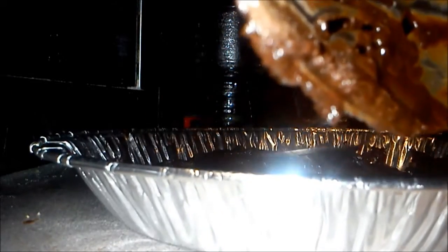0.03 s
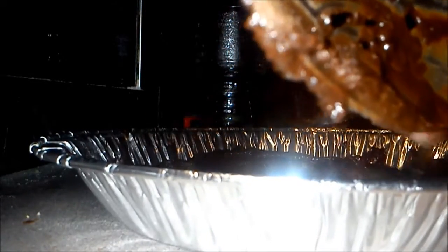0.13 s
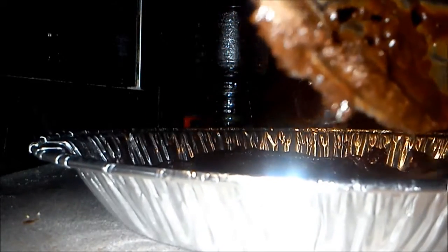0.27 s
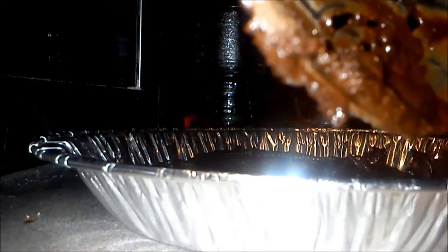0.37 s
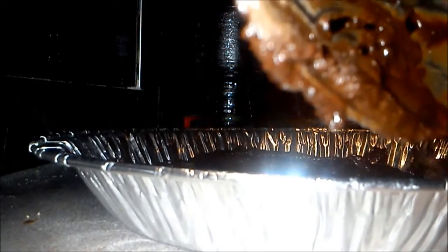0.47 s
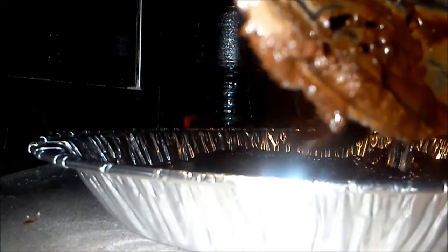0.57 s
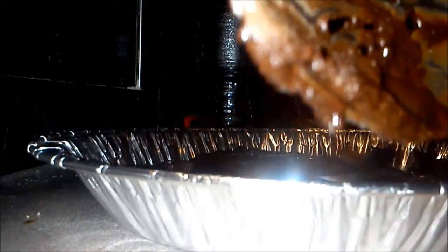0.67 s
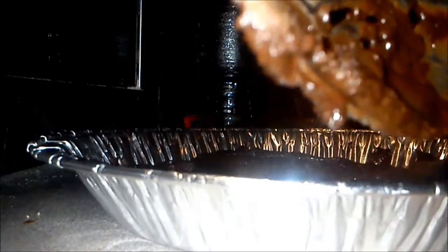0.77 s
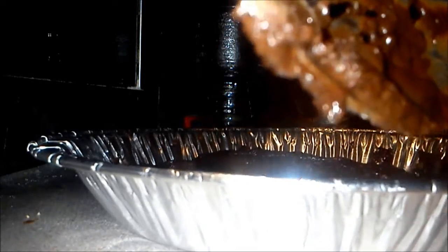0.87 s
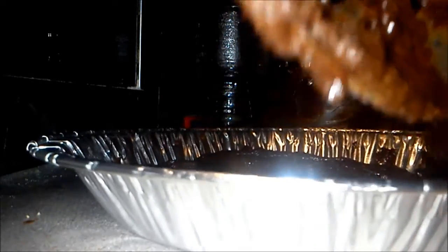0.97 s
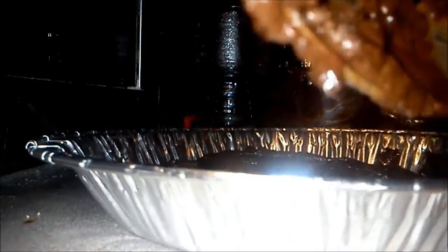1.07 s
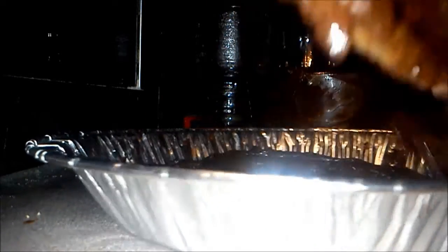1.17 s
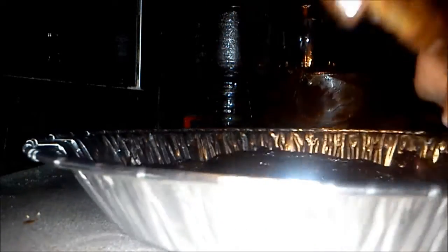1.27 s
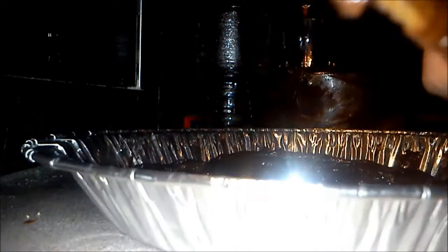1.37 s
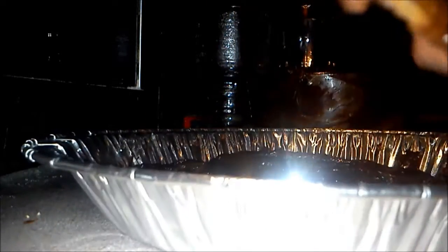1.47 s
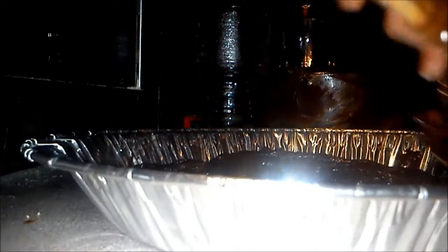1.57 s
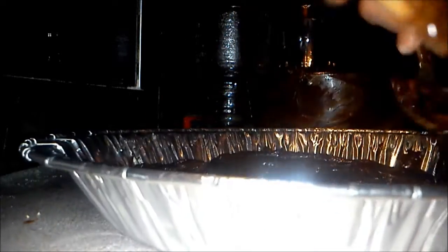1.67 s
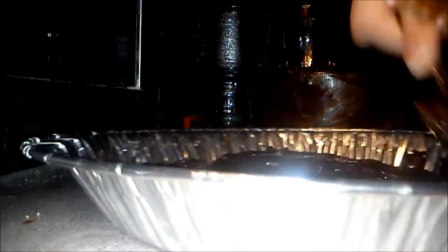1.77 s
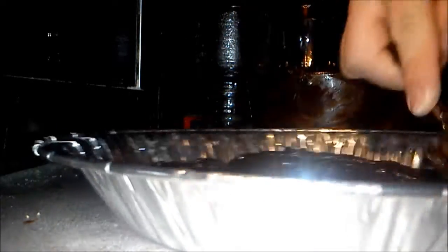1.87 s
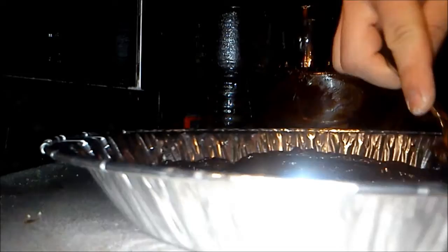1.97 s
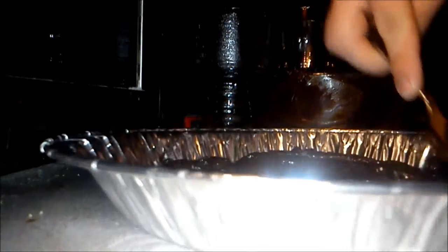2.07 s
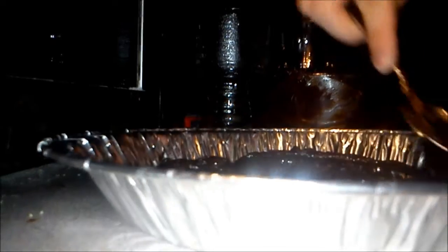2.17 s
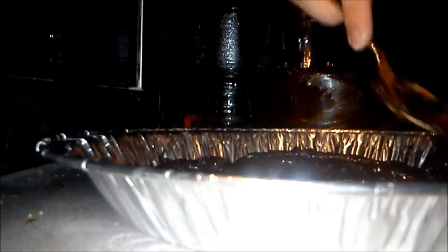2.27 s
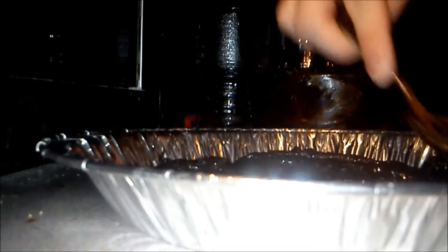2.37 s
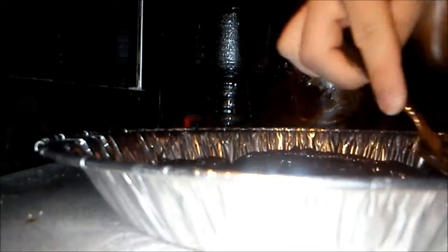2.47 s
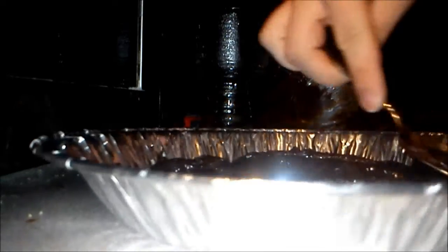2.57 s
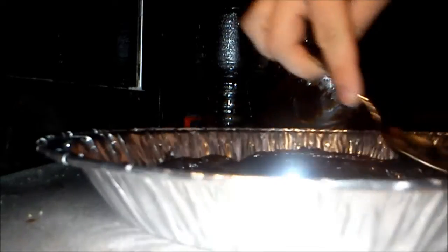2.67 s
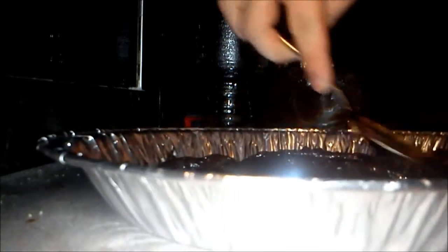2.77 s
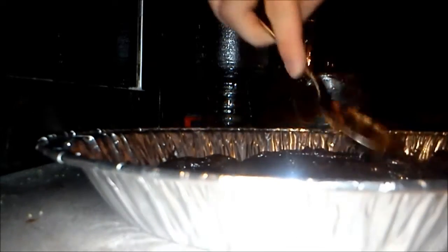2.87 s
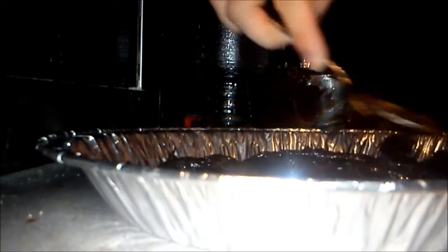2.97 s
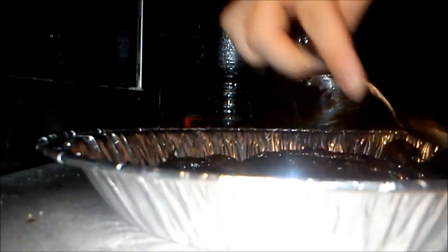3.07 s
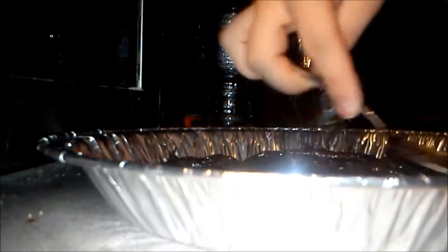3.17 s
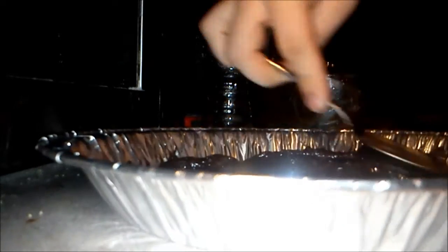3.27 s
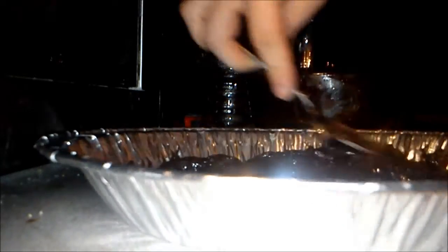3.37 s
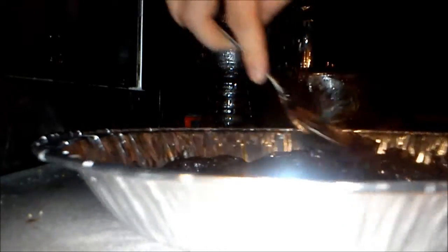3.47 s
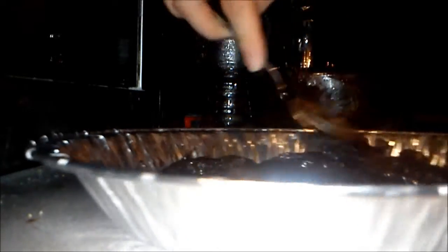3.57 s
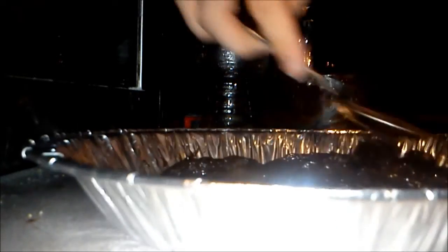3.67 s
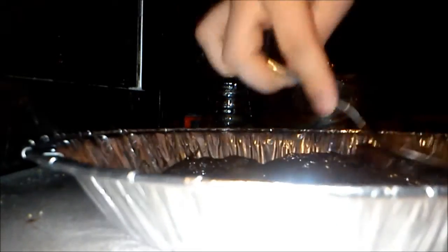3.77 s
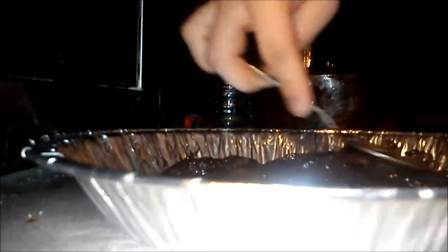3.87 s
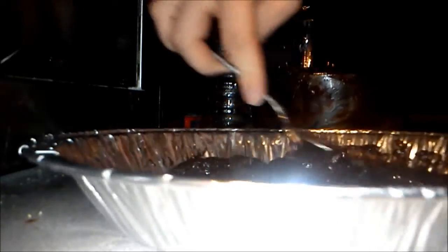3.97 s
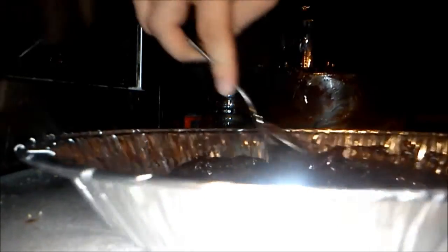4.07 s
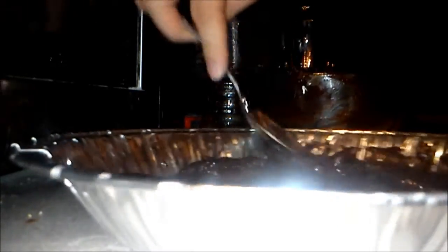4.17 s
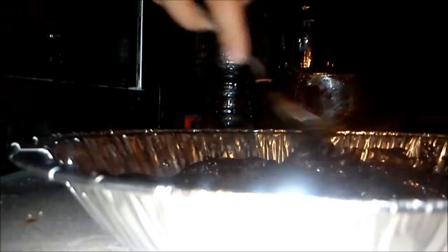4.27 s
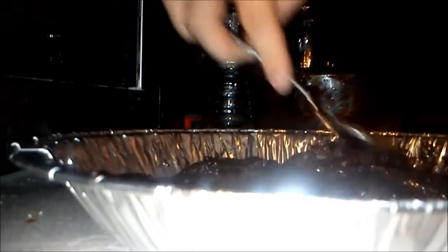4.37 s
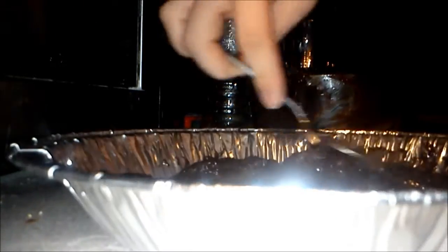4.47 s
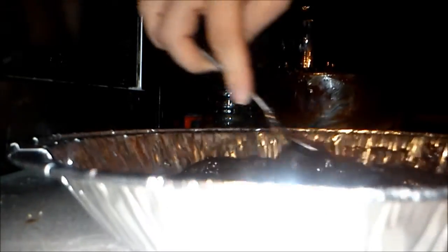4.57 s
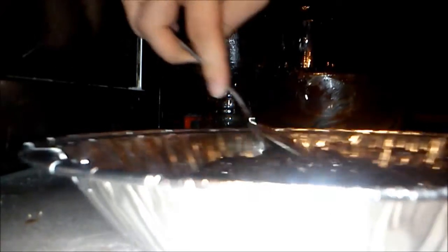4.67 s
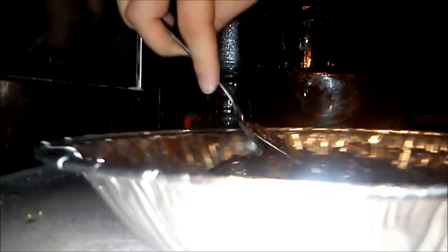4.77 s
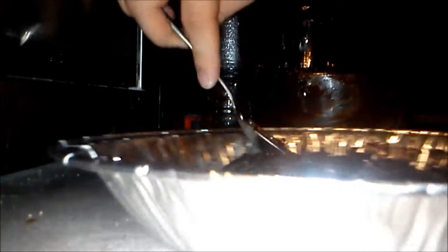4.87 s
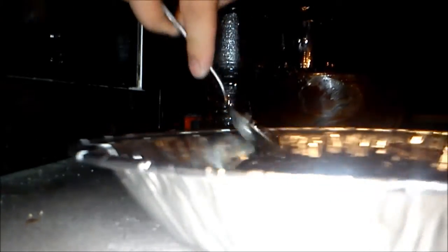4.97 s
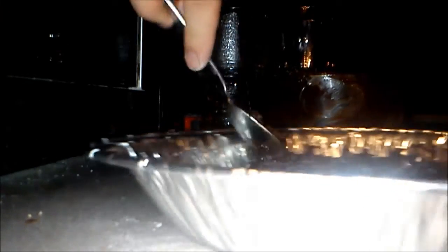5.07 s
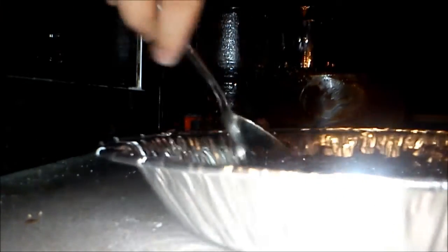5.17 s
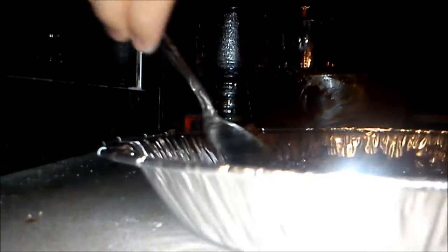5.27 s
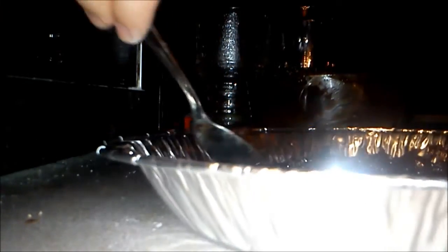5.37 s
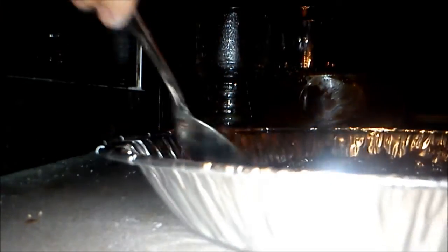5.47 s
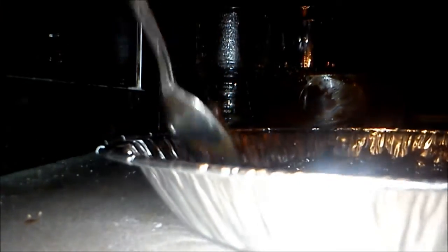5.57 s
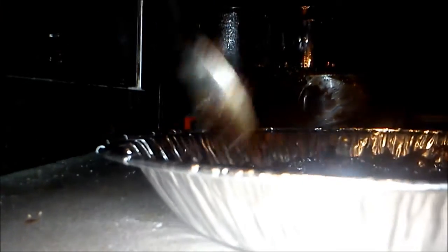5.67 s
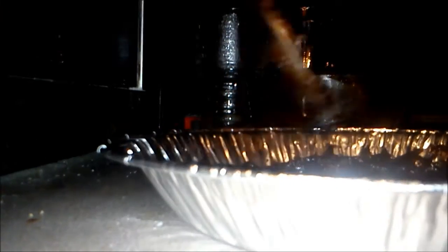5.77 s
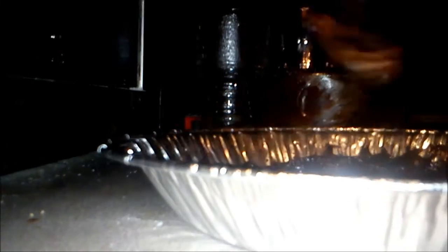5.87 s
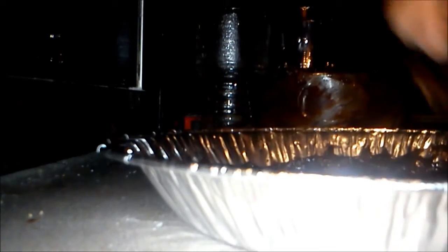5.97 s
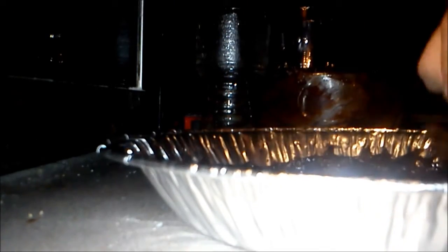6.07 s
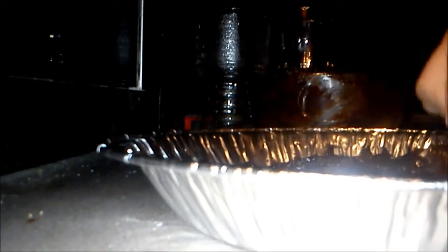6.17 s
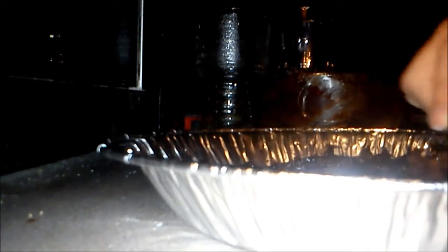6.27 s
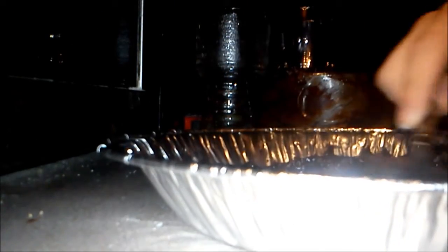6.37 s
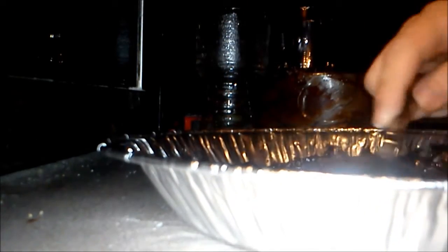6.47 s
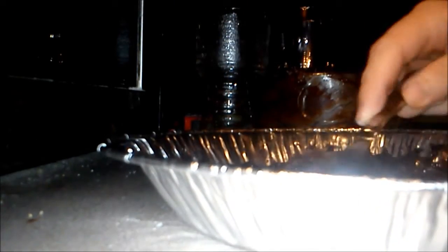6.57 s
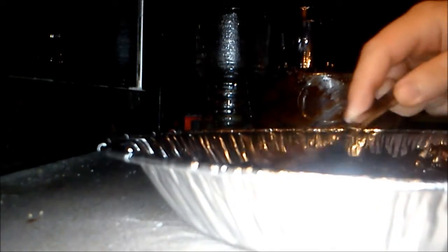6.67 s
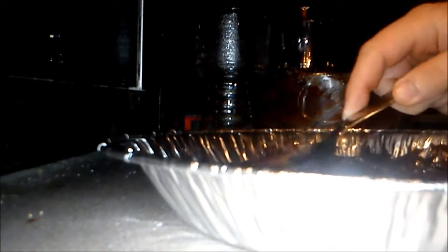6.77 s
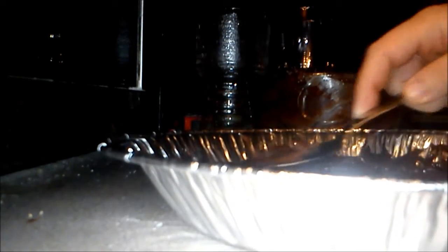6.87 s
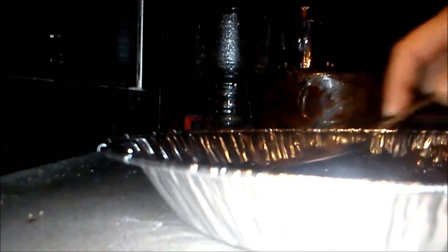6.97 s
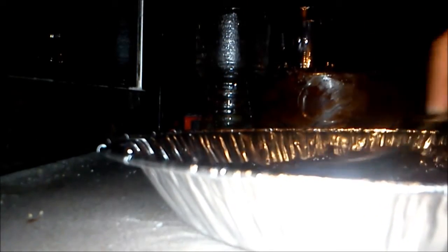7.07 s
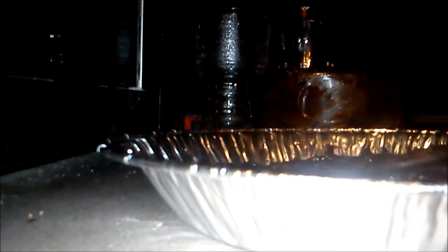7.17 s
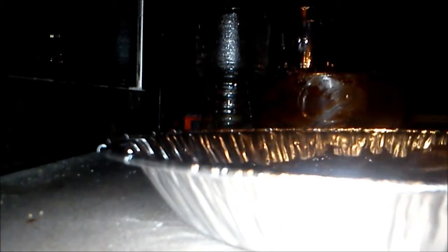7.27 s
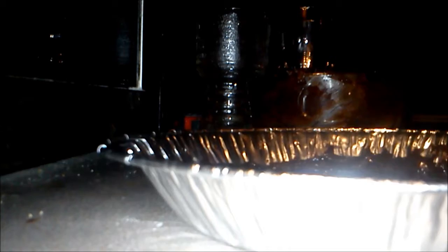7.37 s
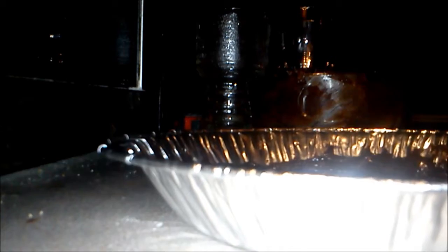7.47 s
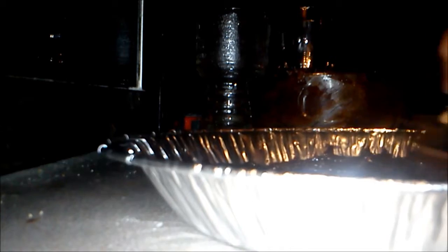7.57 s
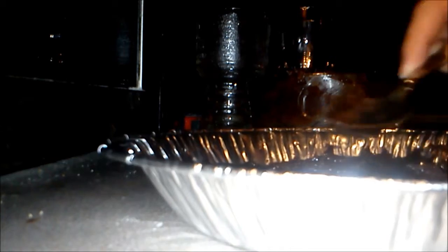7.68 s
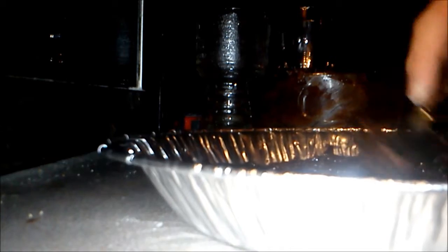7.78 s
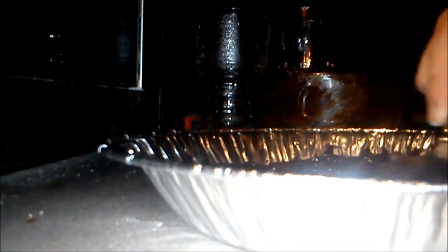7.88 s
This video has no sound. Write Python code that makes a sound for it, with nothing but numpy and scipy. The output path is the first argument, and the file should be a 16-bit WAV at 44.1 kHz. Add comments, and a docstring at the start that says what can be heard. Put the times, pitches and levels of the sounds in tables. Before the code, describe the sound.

A spoon jabs and scrapes a filled foil pan with crinkly snaps and dull thumps, then faint wet ticks over a low kitchen fan hum.

```python
"""A kitchen hums with fan noise and a motor, then soft rubs and rustles begin on a filled foil pie pan, close by.
A spoon's jabs crack the thin wall (noise and ringing modes) and thump the loaded bottom (a decaying low sine).
Rubs are random stick-slip grains coloured by the foil; pleats snap as short noise bursts with their own pitch.
The wet filling ticks in tiny resonant bursts, something slides softly by, and a short echo surrounds it all."""
import sys
import numpy as np
from scipy import signal
from scipy.fft import rfft, irfft
from scipy.io import wavfile
from scipy.ndimage import uniform_filter1d

SR = 44100
rng = np.random.default_rng(int(sys.argv[2]) if len(sys.argv) > 2 else 0)


def bounce(signal):
    """Save signal as a 16-bit WAV file at the path given by the first command-line argument."""
    frames = np.transpose(np.atleast_2d(signal))
    limited = np.clip(frames, -1, 1)
    pcm = np.round(limited * 32767).astype(np.int16)
    wavfile.write(sys.argv[1], SR, pcm)


N = 350154
TOP_HZ = 16000  # upper limit of the whole sound
TIME = np.arange(N) / SR
RING = np.arange(SR // 10) / SR  # time axis of every short sound [s]


def undb(db):
    """Decibels to gain."""
    return 10 ** (np.asarray(db) / 20)


def level(x, db=0):
    """Scale to an rms level."""
    return x * undb(db) / np.sqrt(np.mean(x ** 2))


def burst(x):
    """Scale a short sound to the energy of five milliseconds at an rms of one."""
    return x / np.sqrt(np.sum(x ** 2) / (.005 * SR))


def add(out, s, x):
    """Mix a short sound in at time s."""
    i = int(s * SR)
    out[i:i + len(x)] += x[:N - i]


def decay(t60):
    """Exponential fade of a ringing sound, 60 dB down after t60 seconds."""
    return np.exp(-np.log(1000) * RING / t60)


def curves(table):
    """Columns of a table joined by lines in time."""
    s, *columns = np.transpose(table)
    return [np.interp(TIME, s, c) for c in columns]


def walk(rate):
    """Smooth random drift with a spread near one, from about `rate` fresh values a second."""
    k = int(SR / rate)
    steps = np.repeat(rng.standard_normal(N // k + 1), k)
    return 1.3 * uniform_filter1d(uniform_filter1d(steps, k), k)[:N]


def cut(x, hz, kind, order=3):
    """Low-pass or high-pass."""
    return signal.sosfilt(signal.butter(order, hz, kind, fs=SR, output="sos"), x)


def resonate(x, hz, width):
    """One resonance."""
    return signal.lfilter(*signal.iirpeak(hz, hz / width, fs=SR), x)


def colour(x, points, size=1024):
    """Causal filter through (frequency [Hz], level [dB]) points."""
    hz, db = np.transpose(points)
    f = np.maximum(np.arange(size // 2 + 1) * SR / size, 1)
    curve_db = np.interp(np.log(f), np.log(hz), db)
    # folding the cepstrum forward puts the energy at the start of the response
    cepstrum = irfft(np.log(undb(curve_db)))
    cepstrum[1:size // 2] *= 2
    cepstrum[size // 2 + 1:] = 0
    response = irfft(np.exp(rfft(cepstrum)))
    return signal.fftconvolve(x, response)[:len(x)]


def grains(rate, spread_db):
    """Random slips of uneven size; rate [1/s] may vary in time."""
    size = undb(spread_db * np.minimum(rng.exponential(size=N), 4))
    hits = (rng.random(N) < rate / SR) * rng.choice([-1, 1], N)
    return level(hits * size / np.sqrt(rate))


# modes of the pan, damped by the filling: (nominal pitch [Hz], t60 [s], relative level [dB])
PAN_MODES = [(133.5, 0.39, -5), (209.6, 0.11, -6.5), (261.4, 0.12, -7), (309.5, 0.084, 2), (437, 0.081, -9),
             (736, 0.084, -1.5), (1140, 0.02, -33), (1255, 0.063, -0.5), (1336, 0.02, 2.5),
             (1700, 0.01, -4), (1946, 0.03, 2.5), (2150, 0.031, -8.5), (2430, 0.02, -28.5),
             (3010, 0.024, -6), (4900, 0.009, 6), (7300, 0.029, -7), (8220, 0.02, 9)]


def modes(lo, hi, scatter_db=3):
    """The pan's modes between two pitches; each call weights and detunes them anew, as a new point of contact."""
    hz, t60, db = np.array([m for m in PAN_MODES if lo <= m[0] < hi]).T[:, :, None]
    detune, weight, side = rng.standard_normal((3, len(hz), 1))
    waves = np.sin(2 * np.pi * hz * (1 + .012 * detune) * RING) * decay(t60)
    return burst(np.sum(np.sign(side) * undb(db + scatter_db * weight) * waves, axis=0))


# colour of the crumpling wall: (frequency [Hz], relative level [dB per Hz])
FOIL_COLOUR = [(100, -3), (300, -5.5), (600, -9), (900, -4.5), (1220, -0.5), (2100, 0.5), (2900, -6),
               (3600, -6.5), (5400, -9.5), (7000, -8.5), (10000, -5.5), (11800, -14.5), (16000, -13.5)]


def foil(pleat_hz, crack_s, ring_db, tail_db, tail_s=0.0055, pleat_db=0):
    """One snap of the wall as (body, treble): a crack, a short rustle, the wall's modes and the pleat's own pitch."""
    fade = np.exp(-RING / crack_s) + undb(tail_db) * np.exp(-RING / tail_s)
    crack = colour(rng.standard_normal(len(RING)) * fade, FOIL_COLOUR)
    body = burst(cut(crack, 3600, "low")) + undb(ring_db) * modes(1000, 4500)
    bright = burst(cut(crack, 3600, "high")) + undb(ring_db - 7) * modes(4500, SR)
    pleat = burst(resonate(rng.standard_normal(len(RING)) * fade, pleat_hz, pleat_hz / 3))
    return burst(body), burst(bright + undb(pleat_db) * pleat)


DENT_DB, DENT_T60_S = -3, 0.018  # ring of the spot of wall that a jab dents, level against the wall's body
# jabs of the spoon: (time [s], wall level before the wall_db trim [dB], treble against it [dB],
# thump gain [dB], pitch of the bottom [Hz], pitch of the dented wall [Hz], pitch of the struck pleat [Hz])
JABS = [(2.061, -19, 2, -22.5, 107.5, 1140, 5900), (2.6978, -35, -3, -19.5, 108, 1090, 7340),
        (2.8353, -23.5, -7, -20, 132, 1290, 3280), (3.3607, -23.5, -2.5, -17, 128.3, 2140, 2520),
        (3.3722, -34, -8, -20, 134, 2080, 5900), (3.4471, -33, 1.5, -26, 106, 1940, 7600),
        (4.001, -24.5, -2, -15, 120, 1620, 3050), (4.0056, -25.5, -4, -27.5, 129, 1980, 3430),
        (4.1761, -31.5, -21, -40, 141, 1550, 4520), (4.6726, -40, -8, -27.5, 123, 1640, 3500),
        (4.6864, -44, 2, -34, 143, 1650, 3500)]


def jabs(wall_db=0.5, bottom_db=-1, floor_modes_db=-7, shudder_db=-10, bottom_t60=0.11, shudder_s=0.0066):
    """The spoon cracks the wall and pushes the loaded bottom, which swings like a slack drum and shudders on the counter."""
    out = np.zeros(N)
    for s, db, treble_db, thump_db, hz, dent_hz, pleat_hz in JABS:
        body, treble = foil(pleat_hz, crack_s=.0005, ring_db=-4, tail_db=-14)
        soft_onset = 1 - np.exp(-RING / .004)
        bottom = burst(np.sin(2 * np.pi * hz * RING) * decay(bottom_t60) * soft_onset)
        dent = burst(np.sin(2 * np.pi * dent_hz * RING) * decay(DENT_T60_S))
        low = modes(0, 1000)
        rattle = rng.standard_normal(len(RING)) * np.exp(-RING / shudder_s)
        shudder = burst(cut(cut(rattle, 1000, "low"), 286, "high"))
        wall = body + undb(DENT_DB) * dent + undb(treble_db) * treble
        thump = undb(bottom_db) * bottom + undb(floor_modes_db) * low + undb(shudder_db) * shudder
        add(out, s, undb(db + wall_db) * wall + undb(thump_db) * thump)
    return out


# time constants of a rub setting in, easing off, and of the spoon lifting clear after the scoop
BITE_S, RELEASE_S, LIFT_S = .008, 0.018, 0.004


def drag(start, length, swell_db=0, release_s=RELEASE_S):
    """Gain of one rub: contact sets in, grows or eases off, and lets go."""
    along = np.clip((TIME - start) / length, 0, 1)
    edges = np.minimum(TIME - start, 0) / BITE_S - np.maximum(TIME - start - length, 0) / release_s
    return undb(swell_db * (along - .5)) * np.exp(edges)


SETTLE_DB, SETTLE_S = -22, 0.045  # the wall rustles back into shape: level against the jab, time constant
# short rubs and handling rustles of spoon and foil: (start [s], length [s], gain midway [dB],
# swell from start to end [dB], treble against it [dB])
RUBS = [(0.397, 0.25, -62, -3, -1.5), (0.927, 0.22, -57.5, -5.5, -3.5), (1.149, 0.041, -43.5, 4.5, 1),
        (1.214, 0.068, -53, 0, -10), (1.57, 0.12, -61, -3, 5), (1.707, 0.05, -45, 2, 5),
        (1.985, 0.064, -46.5, 9.5, -6.5), (2.078, 0.051, -41.5, 7.5, -1.5), (2.156, .14, -45.5, 1.5, -6),
        (2.32, 0.043, -44, -3, 1), (2.387, .08, -53.5, 4, -4), (2.53, 0.18, -65, 12, 4.5),
        (2.732, 0.094, -46, 10, 2), (2.85, 0.091, -39.5, 4, -3.5), (3.045, 0.058, -53.5, 2, -0.5),
        (3.198, 0.11, -54, 8, 3), (3.43, 0.043, -51, -3.5, 10.5), (3.587, .1, -47.5, 2, -4),
        (3.701, 0.17, -41, -3, -5), (4.058, .13, -47, 4, 0), (4.222, .23, -44, 4, -3),
        (4.67, 0.057, -43, -4, -1.5), (5.503, 0.19, -57, -1, -6.5), (5.82, 0.12, -54.5, -7.5, -7.5),
        (6.084, .11, -60, 1, -0.5)]
# the long scoop across the pan: (time [s], gain [dB], treble against it [dB])
SCOOP = [(4.76, -61, -3), (4.845, -54.5, 0.5), (4.882, -36, -1.5), (5.02, -39, 1), (5.17, -39.5, 0.5),
         (5.268, -37, 3.5), (5.31, -40.5, -11), (5.385, -45, 5.5), (5.445, -43, 7.5)]


def rubbing(rest_db=-70):
    """Gains (body, treble) of the foil noise: rubs and rustles, the scoop, settling after jabs, a faint resting touch."""
    parts = [(undb(db) * drag(s, length, swell_db), treble_db)
             for s, length, db, swell_db, treble_db in RUBS]
    db, treble_db = curves(SCOOP)
    scoop_start, scoop_end = SCOOP[0][0], SCOOP[-1][0]
    parts.append((undb(db) * drag(scoop_start, scoop_end - scoop_start, release_s=LIFT_S), treble_db))
    for s, db, treble_db, *_ in JABS:
        settling = (TIME > s) * np.exp(-np.abs(TIME - s) / SETTLE_S)
        parts.append((undb(db + SETTLE_DB) * settling, treble_db))
    # separate rubs add as powers
    body = sum(gain ** 2 for gain, _ in parts)
    treble = sum((gain * undb(treble_db)) ** 2 for gain, treble_db in parts)
    return np.sqrt(np.array([body, treble]) + undb(rest_db) ** 2)


def passing_pleats(x, depth_db, size=256):
    """Broad resonances that come and go as the contact moves from pleat to pleat."""
    spectrum = signal.stft(x, nperseg=size)[2]
    peaks = rng.standard_normal(spectrum.shape)
    for _ in range(2):
        peaks = uniform_filter1d(uniform_filter1d(peaks, size=7, axis=0), size=11, axis=1)
    return signal.istft(spectrum * undb(depth_db * peaks / peaks.std()))[1][:N]


def scrape(rub, body_db=-1.5, sizzle_db=-0.5, rumble_db=-10, slips_per_s=3000, judder_db=1.5):
    """Stick and slip of the foil, denser when the rub is stronger; the bottom rumbles along."""
    body_gain, treble_gain = rub
    rate = slips_per_s * (body_gain / undb(-40)) ** 0.37  # slips_per_s holds at a gain of -40 dB
    slips = grains(rate, spread_db=-1.5)
    # each slip spreads through the creased wall and rustles on briefly
    spread = burst(rng.standard_normal(len(RING)) * np.exp(-RING / 0.0091))
    slips = slips + level(signal.oaconvolve(slips, spread)[:N], -14.0)
    rasp = passing_pleats(colour(slips, FOIL_COLOUR), depth_db=2.5)
    body = level(cut(rasp, 3600, "low"), body_db)
    treble = level(cut(rasp, 3600, "high"), sizzle_db)
    rumble = signal.oaconvolve(grains(rate, spread_db=3), modes(0, 1000))[:N]
    judder = undb(judder_db * walk(110))
    return judder * (body_gain * (body + level(rumble, rumble_db)) + treble_gain * treble)


# the loud pleats that snap: (time [s], level before the gain_db trim [dB],
# treble against it [dB], pitch of the pleat [Hz])
CRINKLES = [(1.147, -34.5, -22, 2200), (1.1914, -42.5, 13, 3730), (1.7071, -43, -10, 4200),
            (1.7592, -49.5, 13.5, 6000), (2.1574, -41, 4, 5570), (2.473, -37.5, -7, 2380),
            (2.912, -39, 5, 8360), (3.093, -55.5, 12.5, 7040), (3.528, -30.5, -1, 10300),
            (3.5834, -45.5, 8, 9600), (4.129, -31.5, -7.5, 9000), (4.182, -38, -21, 4500),
            (4.2543, -41, -5, 7600), (4.5031, -45, 6.5, 5600), (4.7817, -32, -4.5, 11000),
            (4.9223, -37.5, 8.5, 9900), (5.194, -30.5, -6, 8200), (5.2375, -32.5, 3.5, 7650),
            (5.2716, -34.5, 4.5, 6700), (5.359, -37.5, 5, 7100), (5.376, -35, 0.5, 9500)]


def crinkles(gain_db=1):
    """Single pleats snap through, each a crack with a strong rustle."""
    out = np.zeros(N)
    for s, db, treble_db, pleat_hz in CRINKLES:
        body, treble = foil(pleat_hz, crack_s=0.0018, ring_db=-11, tail_db=-2)
        add(out, s, undb(db + gain_db) * (body + undb(treble_db) * treble))
    return out


# lesser pleats: one at a random moment of each 1 / SMALL_PER_S; levels against the rubbing
SMALL_PER_S, SMALL_DB, SMALL_SPREAD_DB, SMALL_TREBLE_DB = 22, -2.5, 1, -0.5
SMALL_HZ, SMALL_OCTAVES = 7600, 0.3  # middle pitch and its spread


def small_crinkles(rub):
    """Lesser pleats snap at random, their loudness following the rubbing."""
    out = np.zeros(N)
    for slot in range(int(SMALL_PER_S * N / SR)):
        s = min((slot + rng.random()) / SMALL_PER_S, TIME[-1])
        size, pitch = np.clip(rng.standard_normal(2), -2, 2)
        body_gain, treble_gain = rub[:, int(s * SR)]
        pleat_hz = min(SMALL_HZ * 2 ** (SMALL_OCTAVES * pitch), TOP_HZ)
        body, treble = foil(pleat_hz, crack_s=.0007, ring_db=7, tail_db=-9, pleat_db=-5)
        snap = body_gain * body + undb(SMALL_TREBLE_DB) * treble_gain * treble
        add(out, s, undb(SMALL_DB + SMALL_SPREAD_DB * size) * snap)
    return out


# while the filling is spread, fainter ticks come at random
SPREAD_FROM_S, SPREAD_TO_S, FAINT_DB, FAINT_HZ = 6.58, 7.68, -51, 12300
# sticky ticks of the filling: (time [s], level [dB], pitch [Hz])
WET_TICKS = [(.49, -48.5, 9700), (.546, -47, 11100), (1.004, -49, 6560), (1.132, -43, 9700),
             (1.224, -45, 14900), (2.2285, -46, 11500), (2.3766, -43.5, 8650), (2.792, -40, 9900),
             (2.956, -40.5, 12000), (3.138, -39, 11900), (3.1662, -41, 12600), (3.606, -44, 9400),
             (4.15, -39, 11500), (5.634, -44, 14000), (6.603, -52.5, 10200), (6.718, -47.5, 9700),
             (6.824, -45.5, 10300), (6.907, -47, 13100), (7.217, -52, 6000), (7.24, -47, 12500),
             (7.289, -45.5, 11700), (7.354, -52, 13100), (7.489, -45, 10500), (7.621, -45, 9900)]


def filling(snap_db=-7, small_db=-13, follow_s=.025, width_hz=4500, count=2):
    """Sticky films burst in tiny high ticks, each followed by a few smaller ones."""
    out = np.zeros(N)
    fade = np.exp(-RING / .0007)
    faint = [(s, FAINT_DB, FAINT_HZ) for s in rng.uniform(SPREAD_FROM_S, SPREAD_TO_S, size=7)]
    for s, db, hz in list(WET_TICKS) + faint:
        for k in range(count + 1):
            follower = k > 0  # later, smaller and off pitch
            snap = cut(rng.standard_normal(len(RING)) * fade, 2500, "high", order=2)
            pitch = min(hz * (1 + 0.11 * follower * rng.standard_normal()), TOP_HZ)
            ringing = resonate(resonate(snap, pitch, width_hz), pitch, width_hz)
            tick = burst(ringing) + undb(snap_db) * burst(snap)
            add(out, s + follower * rng.exponential(follow_s), undb(db + follower * small_db) * burst(tick))
    return out


# something slides softly beside the pan, swells and stops
SLIDE_PEAK_S, SLIDE_DB, SLIDE_RISE_DB_PER_S, SLIDE_FALL_DB_PER_S = 1.52, -38, 88, 230
# resonances of the sliding object: (pitch [Hz], width [Hz], relative level [dB])
SLIDE_MODES = [(1990, 550, 5), (2380, 320, 0), (4760, 2500, -17), (9100, 5900, -19)]


def slide():
    """A fine, even rub of dense slips through a few resonances, loudest near 2 kHz."""
    late = TIME - SLIDE_PEAK_S
    db = SLIDE_DB + np.minimum(SLIDE_RISE_DB_PER_S * late, -SLIDE_FALL_DB_PER_S * late)
    slips = cut(grains(5000, spread_db=2), 1500, "high")
    rub = sum(undb(gain) * resonate(slips, hz, width) for hz, width, gain in SLIDE_MODES)
    return level(rub) * undb(db + 0.99 * walk(60.2))


def room(x, wet_db=-15, t60=0.42):
    """Counter and cupboards give a short, dull echo: decaying noise after a 4 ms gap."""
    t = np.arange(SR // 2) / SR
    noise = cut(rng.standard_normal(len(t)), 10700, "low", order=1)
    echo = noise * np.exp(-np.log(1000) * t / t60) * (t > .004)
    return x + undb(wet_db) * signal.oaconvolve(x, echo / np.sqrt(np.sum(echo ** 2)))[:N]


KITCHEN_DB = -46.5  # level of the air before it wavers
# colour of kitchen air and fan: (frequency [Hz], relative level [dB per Hz])
KITCHEN_COLOUR = [(20, -16.5), (36, -9.5), (49, 3.5), (62, -7), (85, -12), (122, -5), (160, -10),
                  (270, -4.5), (400, -8.5), (700, -13.5), (1050, -22), (1500, -21.5), (2100, -28),
                  (5000, -35.5), (16000, -45)]
# motor hum: (middle pitch [Hz], level [dB])
HUM = [(49, -55.5), (263.8, -54), (527.6, -59.5)]


def kitchen(whine_hz=1650, whine_width_hz=130, whine_db=-65):
    """Fan noise with a thin airy whine, and a slightly wavering motor hum."""
    air = level(colour(rng.standard_normal(N), KITCHEN_COLOUR, size=8192), KITCHEN_DB)
    air = air * undb(.3 * walk(5))
    whine = resonate(rng.standard_normal(N), whine_hz, whine_width_hz)
    whine = resonate(whine, whine_hz, whine_width_hz)
    hum = 0
    for hz, db in HUM:
        phase = 2 * np.pi * np.cumsum(hz * (1 + 0.00395 * walk(7))) / SR
        hum = hum + level(np.sin(phase) * undb(1.8 * walk(9)), db)
    return air + level(whine, whine_db) + hum


def scene():
    """Spoon, pan and filling echo in the room, over the humming kitchen."""
    rub = rubbing()
    spoon_and_pan = jabs() + crinkles() + scrape(rub) + slide() + filling() + small_crinkles(rub)
    return (room(spoon_and_pan) + kitchen())[None]


def record(dry):
    """Clip at full scale, then a steep low-pass cuts the top of the treble."""
    return signal.sosfilt(signal.ellip(8, .2, 70, TOP_HZ, fs=SR, output="sos"), np.clip(dry, -1, 1))


dry = scene()
out = record(dry)
bounce(out)
```